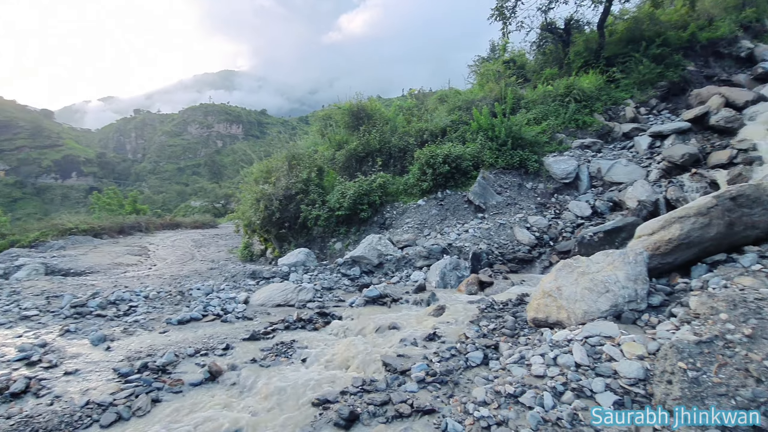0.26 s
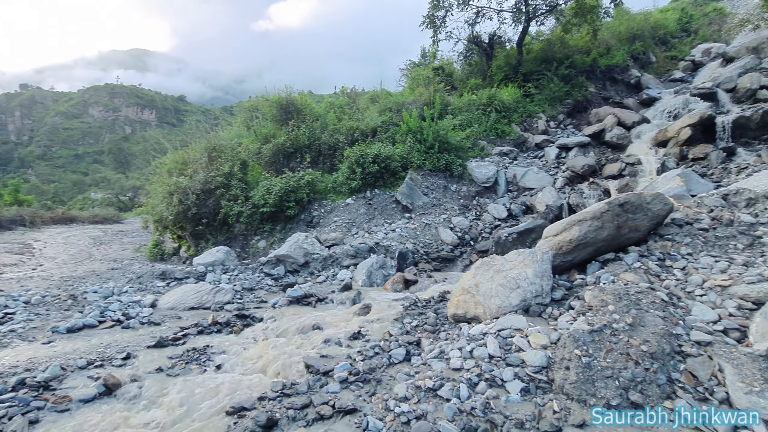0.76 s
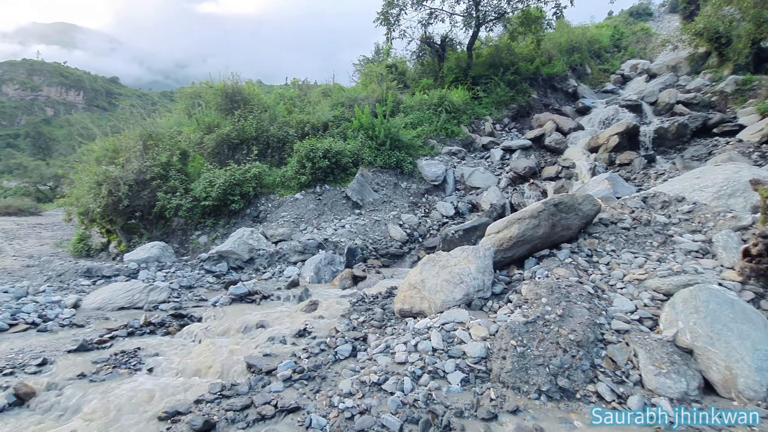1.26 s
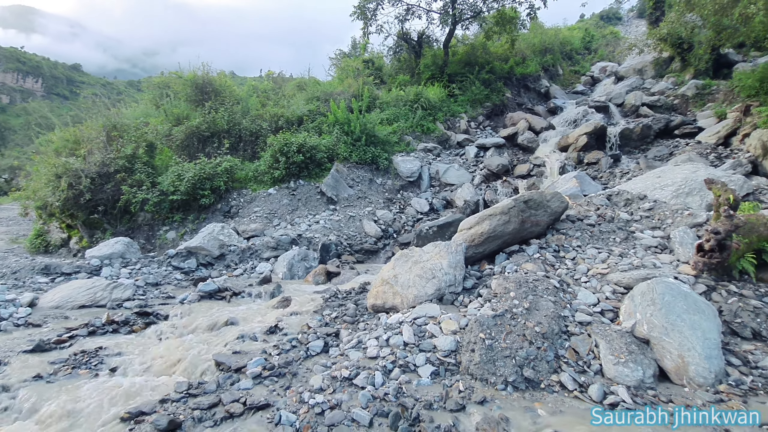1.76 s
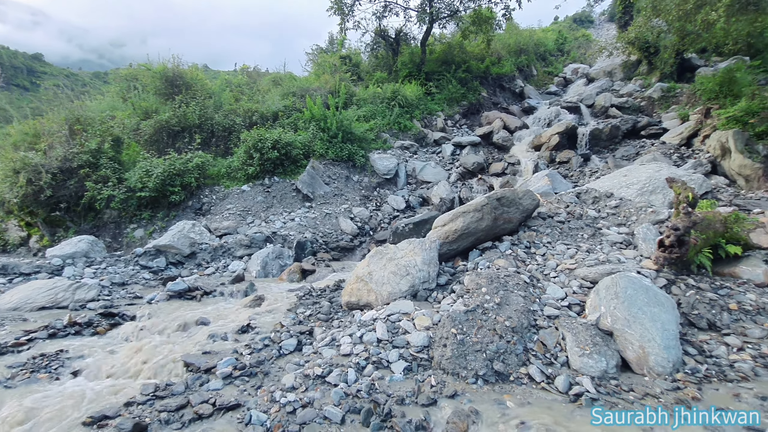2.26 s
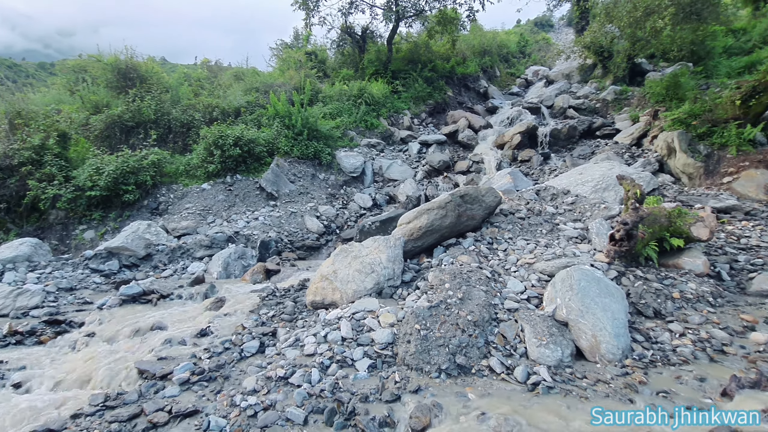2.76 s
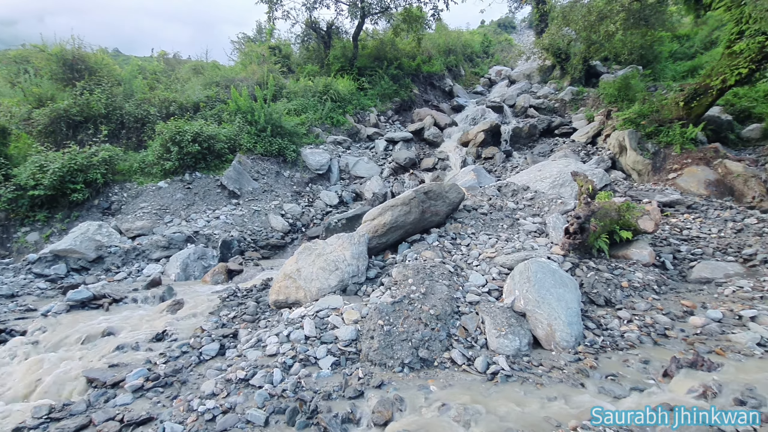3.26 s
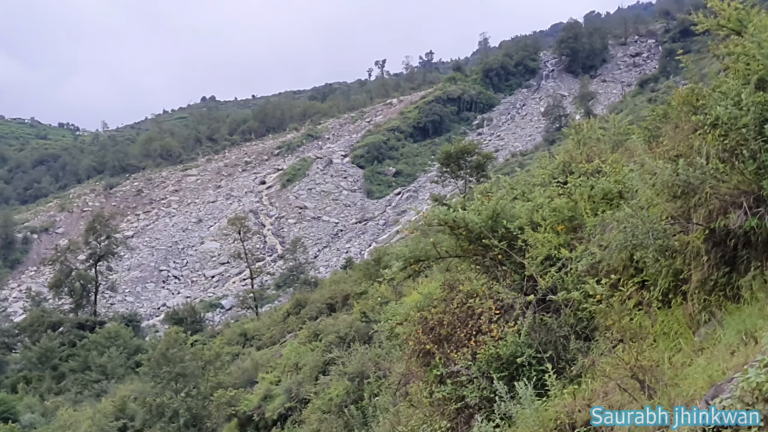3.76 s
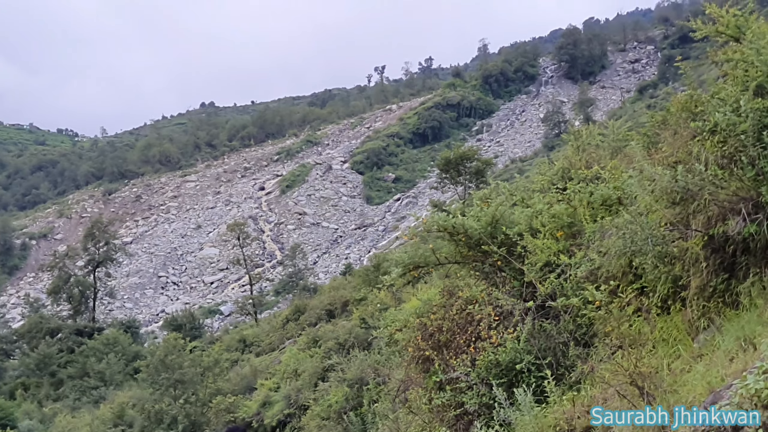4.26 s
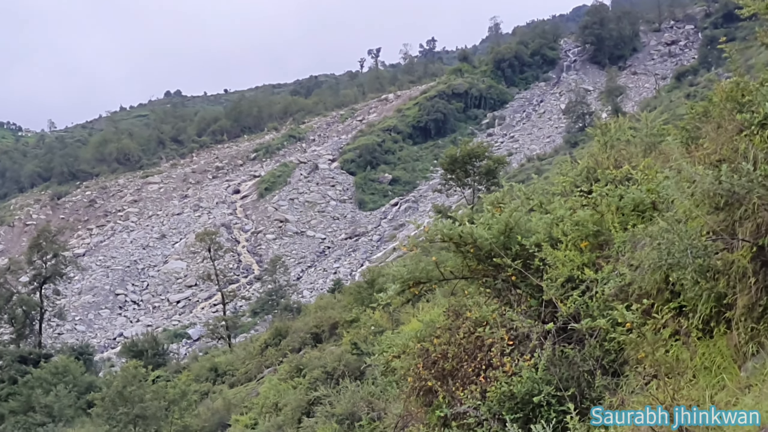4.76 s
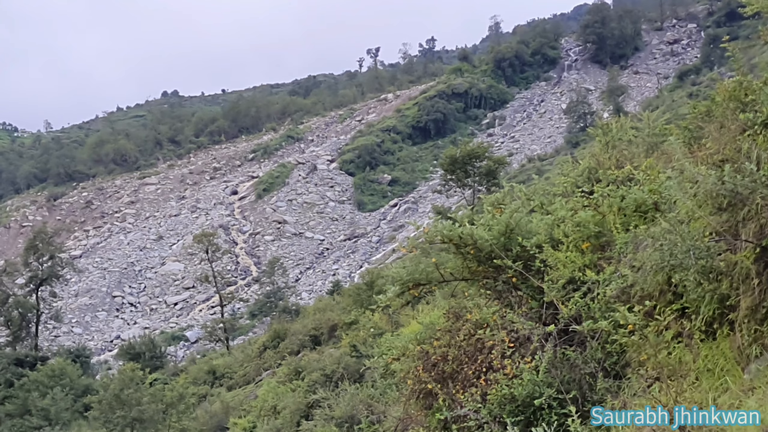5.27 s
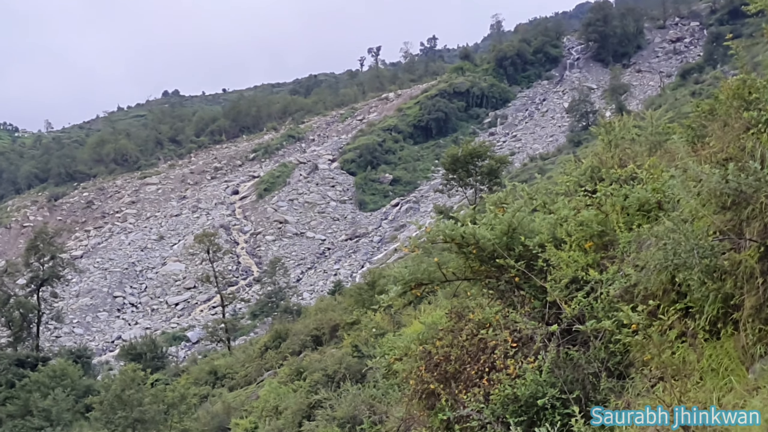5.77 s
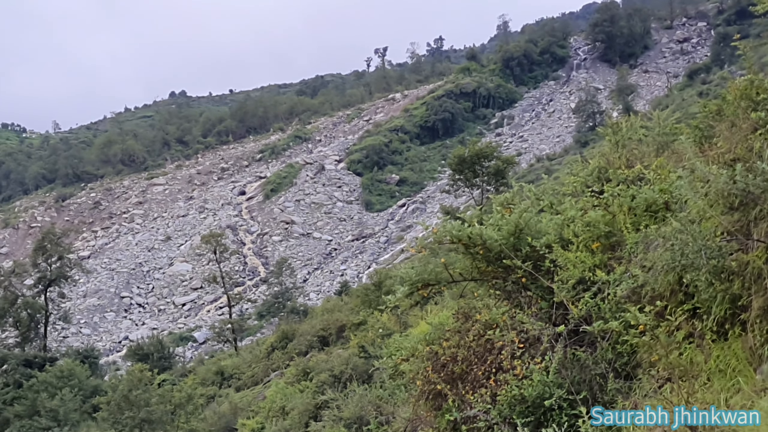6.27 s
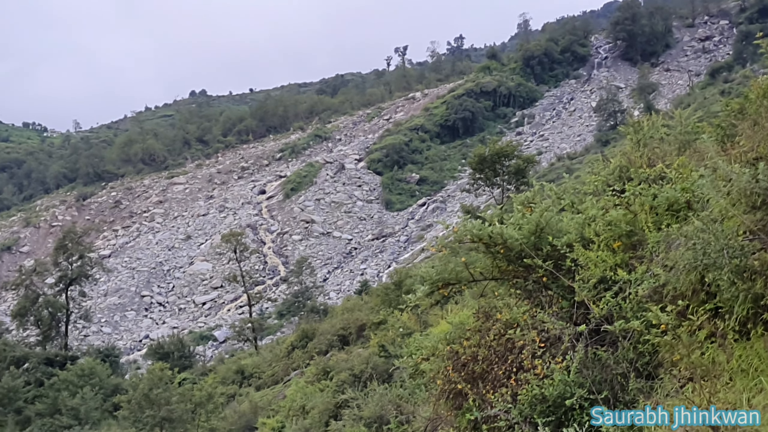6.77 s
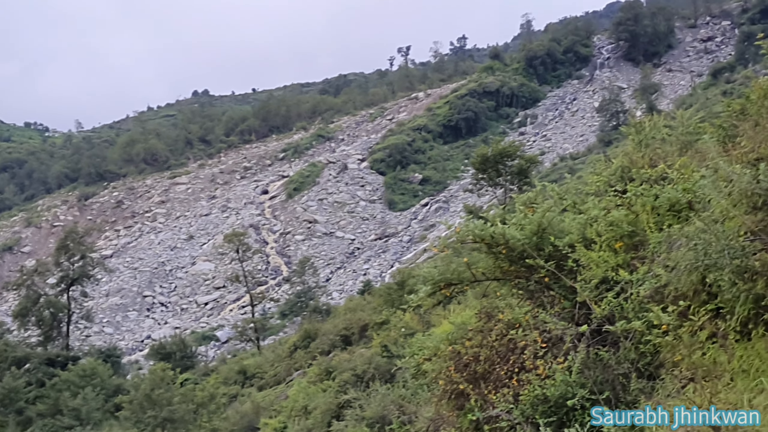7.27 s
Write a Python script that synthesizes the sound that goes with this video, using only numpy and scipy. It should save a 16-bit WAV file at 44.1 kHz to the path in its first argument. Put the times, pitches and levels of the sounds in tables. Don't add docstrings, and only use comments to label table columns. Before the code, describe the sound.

Roaring muddy gully water fills the first four seconds, then drops abruptly to dull far-off flow with brushing stalks, twig snaps and one tiny peep.

```python
import sys
import numpy as np
from scipy import signal
from scipy.fft import rfft, irfft, next_fast_len
from scipy.io import wavfile
from scipy.ndimage import uniform_filter1d, map_coordinates

SR = 44100
rng = np.random.default_rng(int(sys.argv[2]) if len(sys.argv) > 2 else 0)


def materialize(psi):
    bounded = np.clip(np.atleast_2d(psi).T, -1, 1)
    quanta = np.round(bounded * 32767).astype(np.int16)
    wavfile.write(sys.argv[1], SR, quanta)


def invert_db(x):
    u = np.asarray(x, float) / 20
    return 10 ** u


N = 331465

CHANGE_S = 3.84
TURN_S = 5.6
BLADE_PAN_DB = 9.5


def unit(x):
    return x / np.sqrt(np.mean(x ** 2) + 1e-20)


def along(points, hz):
    f, v = np.transpose(points)
    return np.interp(np.log(hz + 1), np.log(f + 1), v)


def curves(rows):
    s, *cols = np.transpose(rows)
    return [np.interp(np.arange(N) / SR, s, c) for c in cols]


def wobble(rate):
    knots = rng.standard_normal(int(N * rate / SR) + 4)
    return map_coordinates(knots, [np.arange(N) * rate / SR])


def filtered(x, response):
    m = next_fast_len(N + 8192)
    return irfft(rfft(x, m) * response(np.fft.rfftfreq(m, 1 / SR)), m)[..., :N]


def coloured(x, spectrum):
    inside = lambda hz: (hz > spectrum[0][0] * .8) & (hz < spectrum[-1][0] * 1.02)
    return unit(filtered(x, lambda hz: invert_db(along(spectrum, hz)) * inside(hz)))


def panned(x, pan_db):
    return x * invert_db(np.outer([.5, -.5], pan_db))


def bubbles(count, hz, spread, cycles, scatter_db, size):
    when, pitch, luck = rng.random((count, 3)).T
    f = np.clip(hz * np.exp(spread * (2 * pitch - 1)), 60, 15000)[:, None]
    t = np.arange(size) / SR
    decay = np.exp(-t * f / cycles) * (1 - np.exp(-4 * t * f))
    size_db = np.minimum(-scatter_db * np.log(luck), 12)
    ring = invert_db(size_db)[:, None] * f * decay * np.sin(2 * np.pi * f * t * (1 + .02 * t * f))
    at = (when * N).astype(int)[:, None] + np.arange(size)
    return unit(np.bincount(at.ravel(), ring.ravel(), N + size)[:N])


def water(spectrum, tilt, patchy_db, ahead, grains=0):
    ports_s = 20 / SR
    z = signal.stft(rng.standard_normal((3, N)), nperseg=512)[2]
    patches = uniform_filter1d(rng.standard_normal(z.shape[1:]), size=6, axis=0)
    patches = uniform_filter1d(patches, size=12, axis=1)
    a, b, direct = signal.istft(z * invert_db(patchy_db * unit(patches)), nperseg=512)[1][:, :N]
    turn = lambda hz: np.arccos(.995 * np.sinc(1.9 * hz * ports_s)) / 2
    mid, side = filtered(np.array([a, b]), lambda hz: np.array([np.cos(turn(hz)), np.sin(turn(hz))]))
    sides = np.array([[1], [-1]])
    aimed = filtered(ahead * direct + grains, lambda hz: np.exp(1j * np.pi * hz * ports_s * sides))
    pair = np.array([mid + side, mid - side]) + aimed
    return coloured(filtered(pair, lambda hz: invert_db(along(tilt, hz) / 2 * sides)), spectrum)


def torrent():
    # (time [s], level [dB])
    flow = [(0, -18), (.6, -18.5), (1.3, -18), (2.1, -17.5), (2.9, -18), (3.8, -18.5)]
    # (frequency [Hz], density [dB per Hz])
    rumble_spectrum = [(13, -47.5), (22, -61.5), (52, -4.5), (76, 0.5), (134, -1), (177, -4), (252, -5),
                       (289, -3), (450, -8), (580, -38.5), (990, -120)]
    rush_spectrum = [(240, -51.5), (400, -17), (515, -5.5), (599, -4), (724, -2), (1060, -8), (1350, -5.5),
                     (2260, -8.5), (2630, -11), (6610, -17.5), (8200, -28), (10700, -56.5), (18000, -120)]
    spray_spectrum = [(4710, -21.5), (8000, -7), (9870, -2), (13500, -4), (14900, -1), (15500, -5)]
    # (frequency [Hz], left over right [dB])
    near_tilt = [(60, 4.5), (110, 2.5), (200, 4), (380, 5), (700, 4), (1290, 5), (2380, 5.0), (4400, 3),
                 (8120, 0.5), (15000, 8)]
    # (time [s], frequency [Hz], peak [dB], t60 [s])
    splash = (.155, 3100, -4.5, .009)
    flow_db, = curves(flow)
    surge_db = 0.15 * wobble(3.04) + 0.27 * wobble(19)
    fizz = .2 * bubbles(count=12000, hz=2500, spread=1.3, cycles=3, scatter_db=3, size=256)
    spit = 0.32 * bubbles(count=12000, hz=11100, spread=0.25, cycles=1.5, scatter_db=2.0, size=48)
    rumble = invert_db(-4 + .4 * wobble(6)) * water(rumble_spectrum, near_tilt, patchy_db=.8, ahead=.2)
    rush = invert_db(surge_db) * water(rush_spectrum, near_tilt, patchy_db=.9, ahead=.2, grains=fizz)
    spray = invert_db(-11.5 + surge_db) * water(spray_spectrum, near_tilt, patchy_db=.6, ahead=.15, grains=spit)
    s, hz, db, t60 = splash
    t = np.maximum(np.arange(N) / SR - s, 0)
    drip = invert_db(db - 60 * t / t60) * (1 - np.exp(-t / 0.00077)) * np.sin(2 * np.pi * hz * t)
    return invert_db(flow_db + 2.0) * (rumble + rush + spray) + drip * invert_db([[1.5], [-1.5]])


def gain_control():
    # (time [s], depth [dB])
    ducks = [
        (.157, 4),
        (2.336, 4.5),
    ]
    t = np.arange(N) / SR
    gain_db = 0
    for s, db in ducks:
        creep = -np.exp(-np.abs(t - s) / 0.35)
        swell = np.exp(-np.abs(t - s) / 0.037)
        gain_db = gain_db + db * np.where(t > s, creep, swell) / 2
    return invert_db(gain_db)


def strokes():
    # (time [s], length [s], blades [dB], stalks over blades [dB],
    # twigs over blades [dB])
    brushes = [(3.895, .03, -57, -6, -6), (3.93, 0.026, -53, -11, -8), (3.968, .03, -55.5, -13, 0),
               (3.992, 0.06, -47.5, -13.5, 4.5), (4.495, 0.062, -65, -1.5, 0), (4.57, .1, -57, -13, 3),
               (4.66, .03, -54, -16, 2), (4.693, .075, -47.5, -15.5, 5), (4.79, .05, -61, -11, 12),
               (5.045, .11, -61, -11, 2), (5.165, 0.058, -56, -6.5, -6), (5.25, 0.091, -58.5, -12.5, 0),
               (5.36, .03, -57, -9, -2), (5.4, 0.049, -46.5, -13.5, -5), (5.8, .06, -65, -10, 4),
               (5.862, .05, -60, -6, 2), (5.94, .07, -57, -16.5, 9), (6.1, 0.078, -56.5, -13, 9),
               (6.47, .15, -72, -4, 6), (6.65, 0.12, -63, -9, 11), (6.79, 0.062, -53, -13, -6),
               (7.35, 0.099, -53.5, -13.5, 4), (7.48, .04, -51, -16, 2)]
    attack_s, release_s = .005, .025
    sway_db = -78.5
    t = np.arange(0, N / SR, .001)
    s, length, db, stalk_db, twig_db = np.transpose(brushes)[..., None]
    shape = np.exp(-np.maximum(s - t, 0) / attack_s - np.maximum(t - s - length, 0) / release_s)
    power = [np.sum((invert_db(db + over_db) * shape) ** 2, axis=0) for over_db in (0, stalk_db, twig_db)]
    power[1] += invert_db(2 * sway_db) * (t > TURN_S)
    return curves(np.transpose([t, *np.sqrt(power)]))


def grass():
    # (frequency [Hz], level [dB])
    blade_spectrum = [(3000, -25), (3800, -10.5), (4600, -1), (5500, -1), (6800, -5), (7700, -28.5),
                      (8300, -25)]
    stalk_spectrum = [(7300, -25), (8000, -11.5), (8800, 2), (10000, 2.5), (12000, -2.5), (14500, 2.5),
                      (15700, 0)]
    twig_spectrum = [(450, -25), (700, -2.5), (1300, -3.5), (2300, -4), (3500, -14), (4300, -17.5)]
    # (time [s], blades peak [dB], stalks over blades [dB],
    # twigs over blades [dB])
    snaps = [(3.937, -54, -5, 10), (4.0162, -43, -8, 6), (4.0407, -47, -14, -1), (4.7022, -48, -15, 5.5),
             (4.7376, -43, -17, -5), (4.745, -42, -17, -3), (4.762, -37, -13, 3), (4.8294, -55, -10, 11),
             (5.2, -42, -3, -5), (5.239, -53, -7, 7), (5.429, -43.5, -10, 2), (5.8915, -52, -6, 5),
             (6.1344, -40.5, -14, 1), (6.473, -54, -9, 14), (6.8344, -54, -11, 2), (6.8525, -49, -9, -2),
             (6.866, -51, -8, -4), (6.894, -43, -23, -6), (7.4194, -53, -11, 10), (7.4724, -46, -17, 2.5),
             (7.501, -43.5, -18, 0), (7.508, -42, -19, 5)]
    scuffs = [
        (4.0164, -43, -8, 7),
        (4.0564, -45, -14, -2),
        (4.4982, -62.5, -7.5, 6),
        (5.0484, -48, -13.5, 4),
        (5.1632, -44, -3.5, -5.5),
        (5.393, -42.5, 0.5, -6),
    ]
    layers = ((blade_spectrum, BLADE_PAN_DB), (stalk_spectrum, 16), (twig_spectrum, BLADE_PAN_DB))
    crackle = invert_db(3.7 * wobble(350))
    grainy = lambda spectrum: coloured(rng.standard_normal((2, N)) * crackle, spectrum)
    blades, stalks, twigs = (gain * panned(grainy(spectrum), [pan])
                             for gain, (spectrum, pan) in zip(strokes(), layers))
    out = invert_db(-2.0) * blades + stalks + invert_db(-2.5) * twigs

    parts = np.array([panned(coloured(rng.standard_normal((2, N)), spectrum), [pan])
                      for spectrum, pan in layers])
    t = np.arange(SR // 20) / SR
    snap = invert_db(7.5 - 60 * t / .009)
    scuff = invert_db(1.0 - 60 * np.maximum(t - .007, 0) / 0.019) * (1 - np.exp(-t / 0.00089))
    for events, shape in ((snaps, snap), (scuffs, scuff)):
        for s, db, stalk_db, twig_db in events:
            start = round(s * SR)
            k = slice(start, start + len(t))
            noise = parts[..., k]
            held = shape[:noise.shape[2]]
            energy = np.sum((noise * held) ** 2, axis=(1, 2), keepdims=True)
            steady = noise / np.sqrt(energy / np.sum(2 * shape ** 2))
            burst = np.tensordot(invert_db(np.array([-1.5, stalk_db - 0.5, twig_db - 6])), steady, axes=1)
            out[:, k] += invert_db(db) * held * burst

    top = filtered(out, lambda hz: hz > 11600)
    return out - (1 - invert_db(-5.5)) * top * (np.arange(N) / SR > TURN_S)


def knocks():
    # (time [s], frequency [Hz], peak [dB])
    breaks = [
        (4.0165, 1250, -27),
        (4.7625, 1500, -30),
    ]
    t60_s = .012
    out = 0
    for s, hz, db in breaks:
        u = np.maximum(np.arange(N) / SR - s, 0)
        out = out + invert_db(db) * invert_db(-60 * u / t60_s) * np.sin(2 * np.pi * hz * u)
    return panned(out, [BLADE_PAN_DB / 2])


def bird():
    # (time [s], frequency [Hz], level [dB])
    peep = [
        (5.7, 5734, -71),
        (5.724, 6162, -64),
        (5.74, 6240, -70),
        (5.768, 6040, -60),
        (5.79, 5636, -77),
    ]
    hz, db = curves(peep)
    t = np.arange(N) / SR
    gate = np.clip(np.minimum(t - peep[0][0], peep[-1][0] - t) / .012, 0, 1)
    whistle = np.sin(2 * np.pi * np.cumsum(hz) / SR)
    return invert_db([[1.5], [-1.5]]) * np.sqrt(2) * gate * invert_db(db) * whistle


def far_torrent():
    # (frequency [Hz], density [dB per Hz])
    rumble_spectrum = [(13, -64), (22, -36), (69, 1.5), (98, 0), (265, -5), (328, -4.5), (354, -4.5),
                       (450, -11), (580, -17), (990, -120)]
    rush_spectrum = [(240, -8), (400, -10), (543, -6), (614, -4.5), (694, -5), (873, -8), (972, -11),
                     (1100, -9), (1740, -9), (2360, -11.5), (3790, -18.5), (4560, -21), (6380, -26),
                     (9790, -49), (15500, -51.5)]
    # (frequency [Hz], left over right [dB])
    far_tilt = [(60, 4.5), (110, 1.0), (200, 4), (380, 4.5), (700, 4.5), (1290, 5.5), (2380, 6), (4400, -1),
                (8120, 12.5), (15000, 27)]
    rumble = invert_db(-1.4 + .4 * wobble(3.8)) * water(rumble_spectrum, far_tilt, patchy_db=.8, ahead=.3)
    rush = invert_db(.4 * wobble(4)) * water(rush_spectrum, far_tilt, patchy_db=.8, ahead=.42)
    return invert_db(-42.5) * (rumble + rush)


def scene():
    far = far_torrent() + grass() + knocks() + bird()
    near = torrent() * gain_control()
    balance_db = -.4
    return panned(np.where(np.arange(N) / SR < CHANGE_S, near, far), [balance_db])


def thinned(x, quiet_db, faint_db):
    # (frequency [Hz], threshold [standard deviations])
    starved = [(6800, 3.5), (7500, 1.3), (8200, .6), (9200, 1.5), (10500, 2.6), (15000, 3)]
    hz, _, z = signal.stft(x, SR, nperseg=1024)
    power = np.abs(z) ** 2
    short = uniform_filter1d(rng.standard_normal(z.shape[1:]), size=9, axis=0)
    short = unit(uniform_filter1d(short, size=5, axis=1))
    level = uniform_filter1d(power, size=24, axis=1)
    floor_db = quiet_db + 3.5 * short + 6 * (hz > 15250)[:, None]
    audible = level.sum(axis=0) > invert_db(2 * floor_db)
    kept = (short < along(starved, hz)[:, None]) & audible & (power > level * invert_db(-2 * faint_db))
    treble = np.log(power[:, hz > 4000].sum(axis=(0, 1)) + 1e-20)
    sudden = np.abs(np.gradient(treble)) > .55
    gain = np.where((hz < 3500)[:, None] | sudden, 1, kept * invert_db(.9))
    return signal.istft(z * gain, nperseg=1024)[1][:, :N]


def edit():
    t = np.arange(N) / SR
    sag_db = 9.5 * (1 - np.exp(-np.maximum(t - 3.714, 0) / 0.024))
    drop_s, trail_db_per_s = 3.7865, 1500
    drop_db = 30 * np.clip((t - drop_s) / .004 + 1, 0, 1) + trail_db_per_s * np.maximum(t - drop_s, 0)
    rise = np.clip((t - 3.866) / .12, 0, 1) ** 1.15
    return np.where(t < CHANGE_S, invert_db(-np.minimum(sag_db + drop_db, 200)), rise)


def roll_off(x):
    return signal.sosfilt(signal.butter(12, 15650, fs=SR, output="sos"), x)


def record(dry):
    held = dry / (1 + np.abs(dry) ** 8) ** (1 / 8)
    thin = thinned(held, quiet_db=-96, faint_db=2.5)
    mix = edit() * filtered(thin, lambda hz: hz < 15650)
    return roll_off(mix)


dry = scene()
out = record(dry)
materialize(out)
```